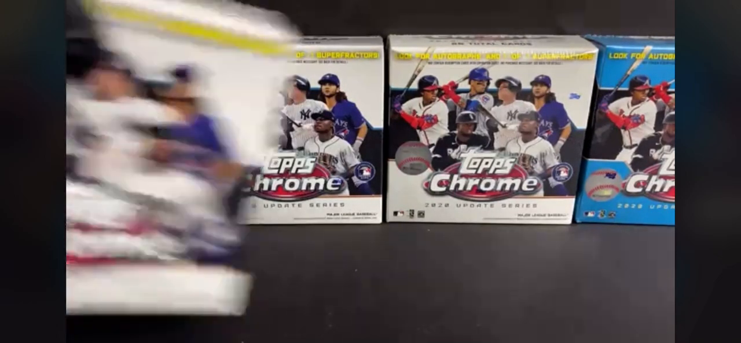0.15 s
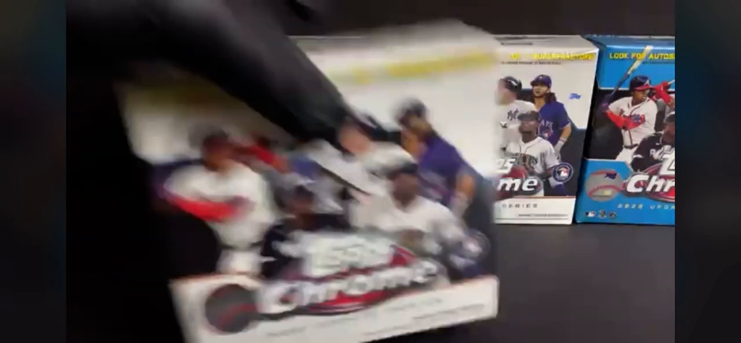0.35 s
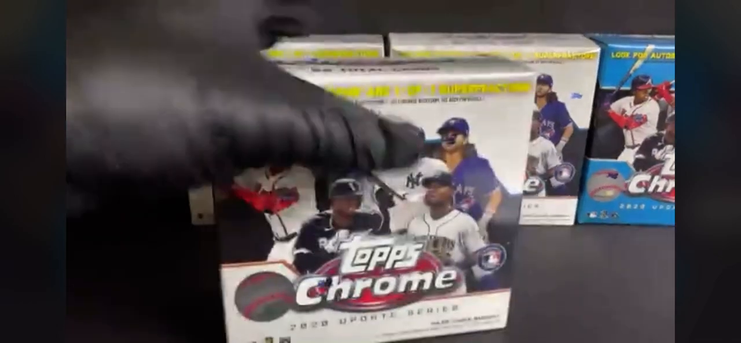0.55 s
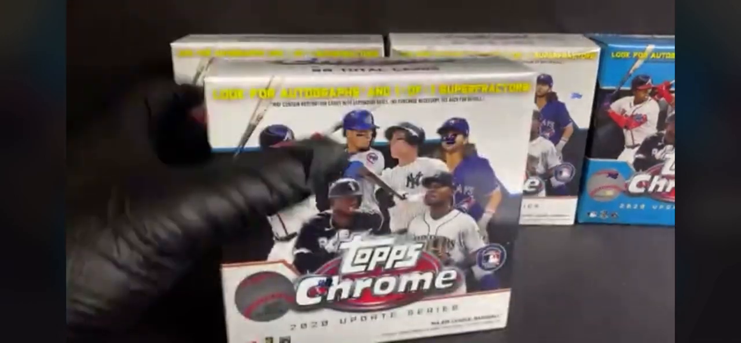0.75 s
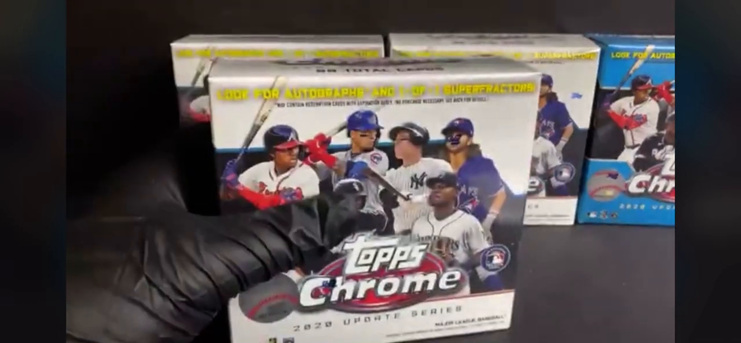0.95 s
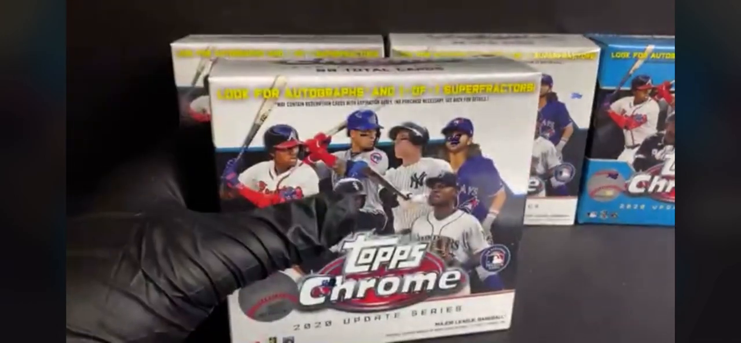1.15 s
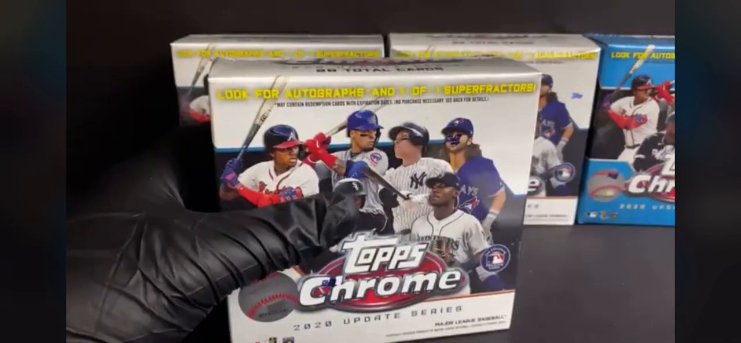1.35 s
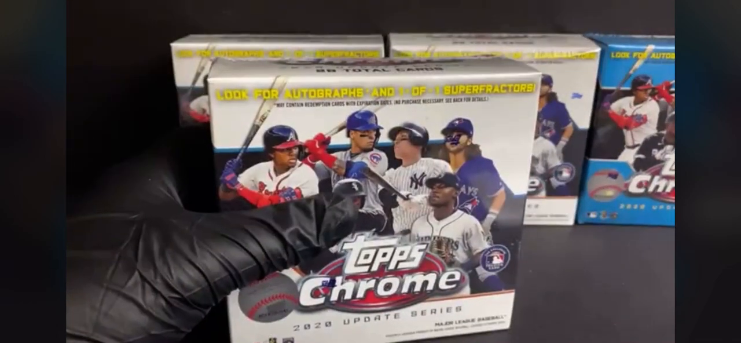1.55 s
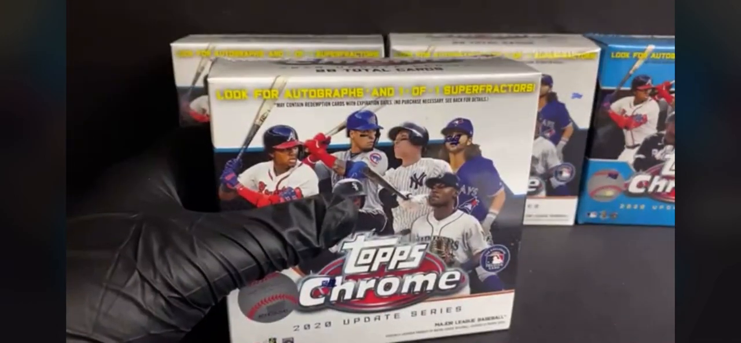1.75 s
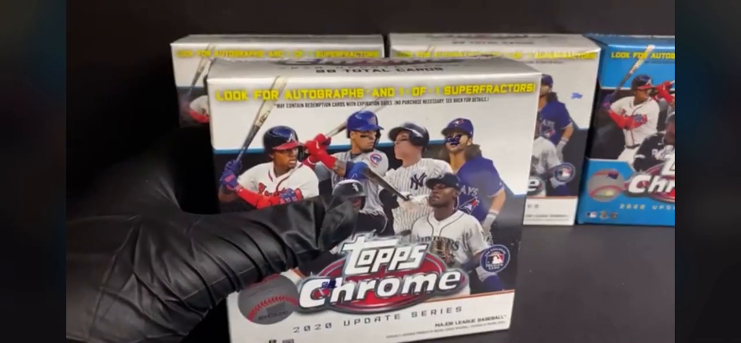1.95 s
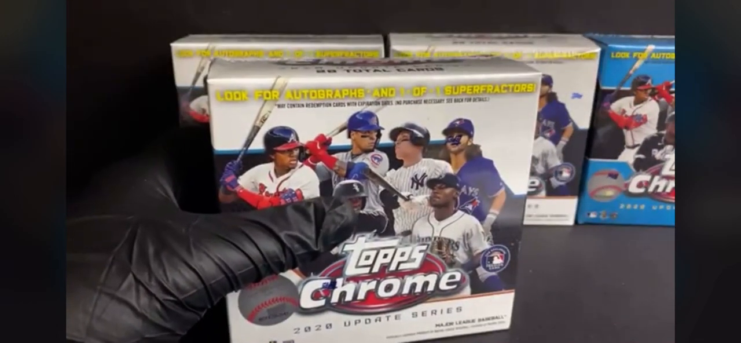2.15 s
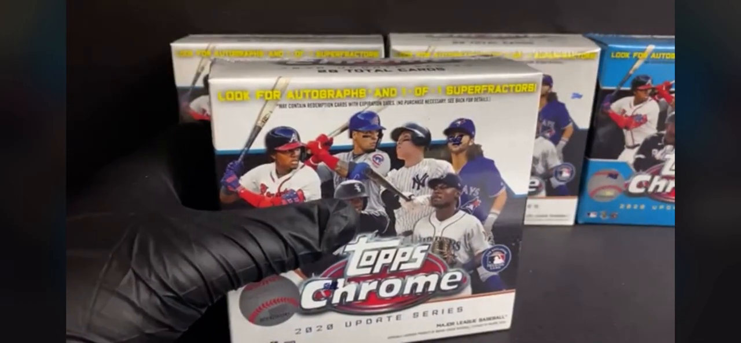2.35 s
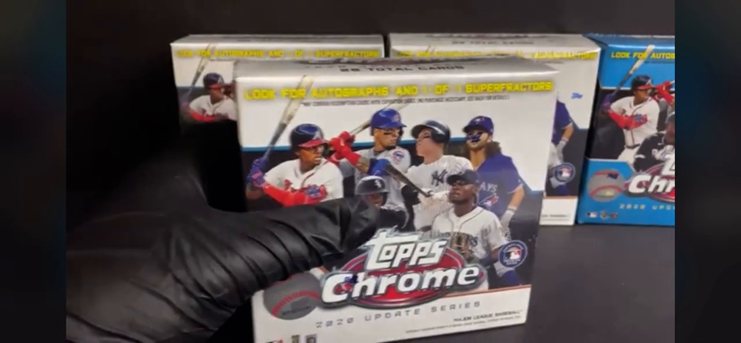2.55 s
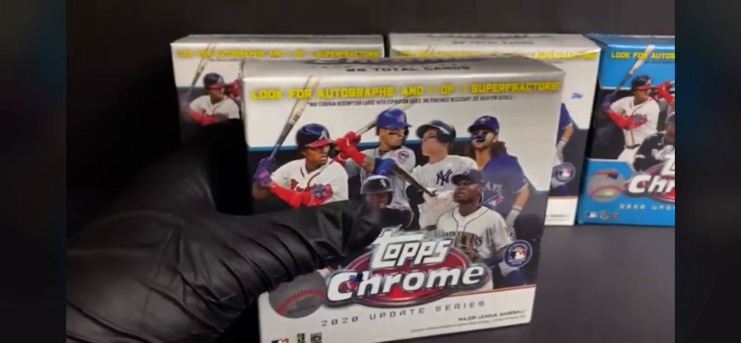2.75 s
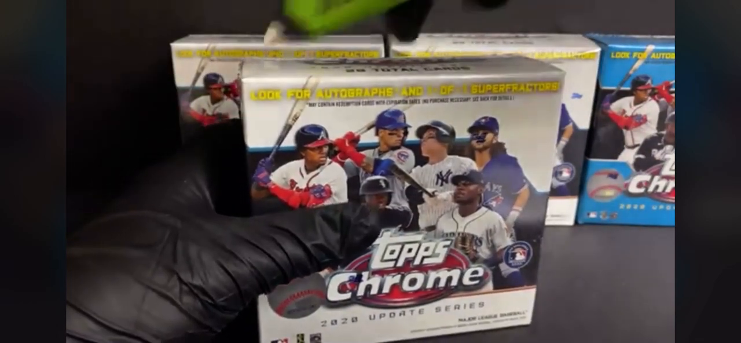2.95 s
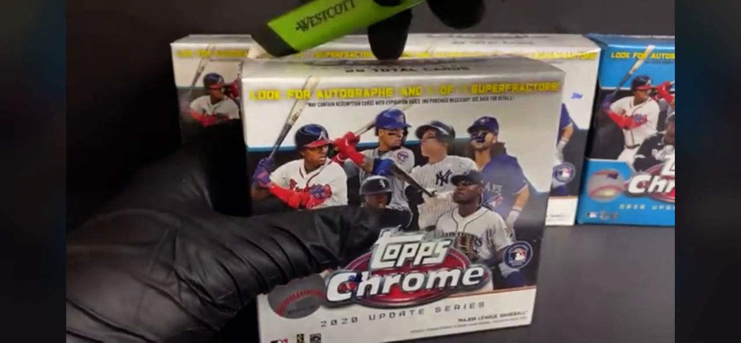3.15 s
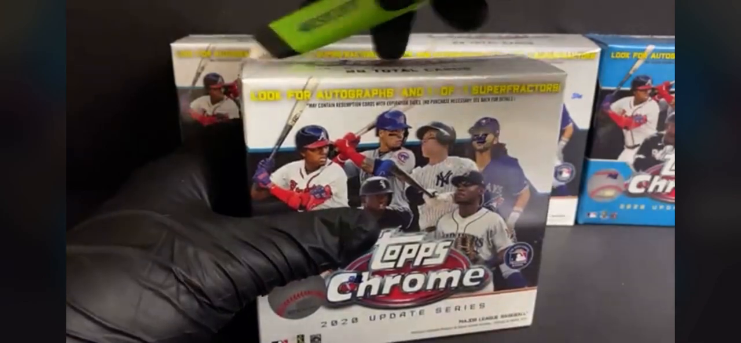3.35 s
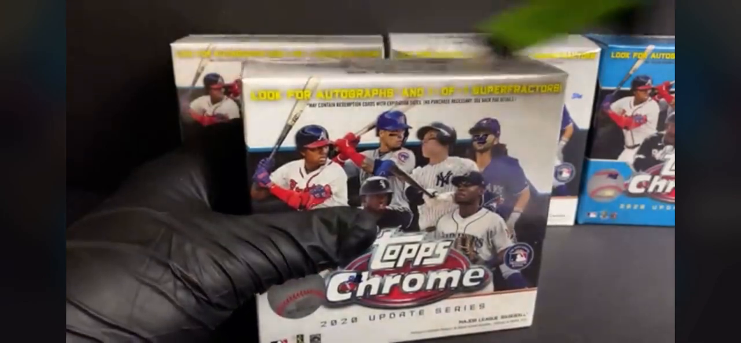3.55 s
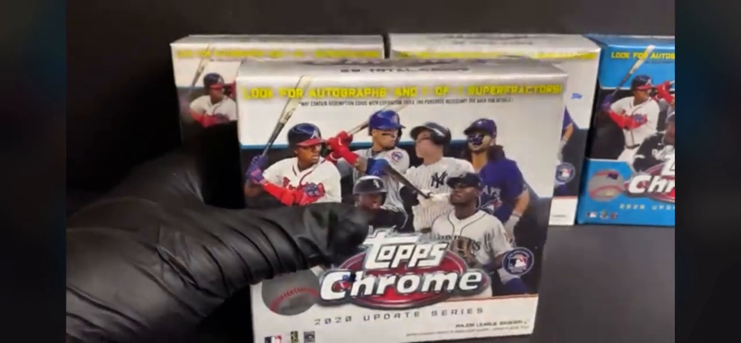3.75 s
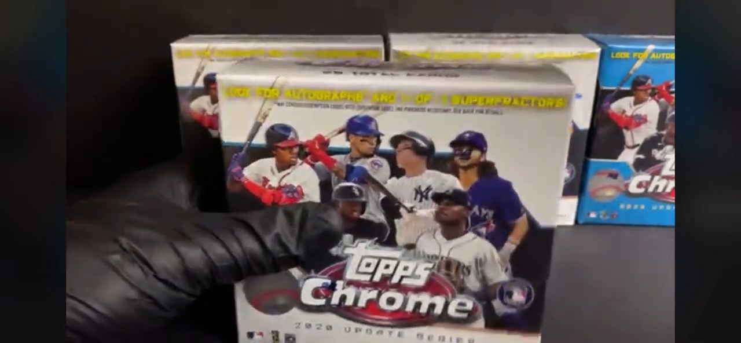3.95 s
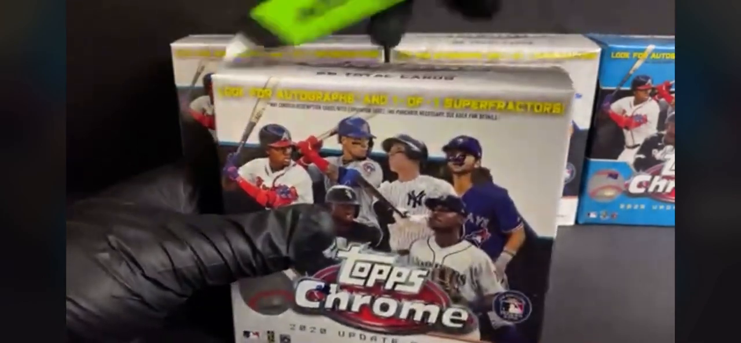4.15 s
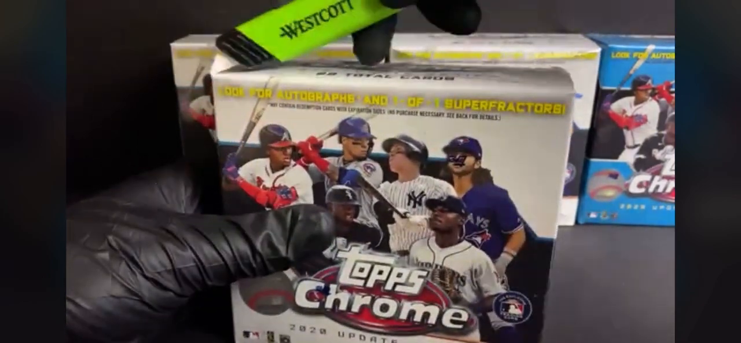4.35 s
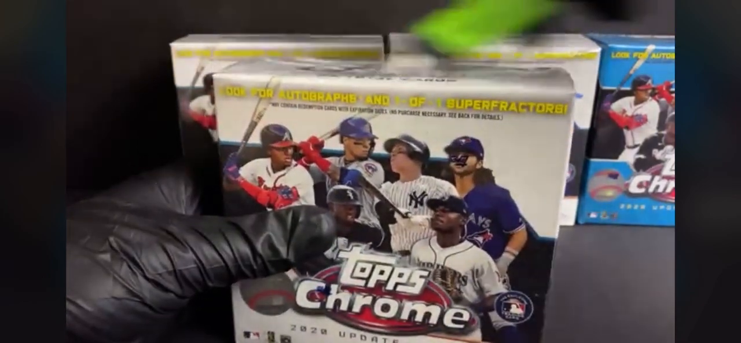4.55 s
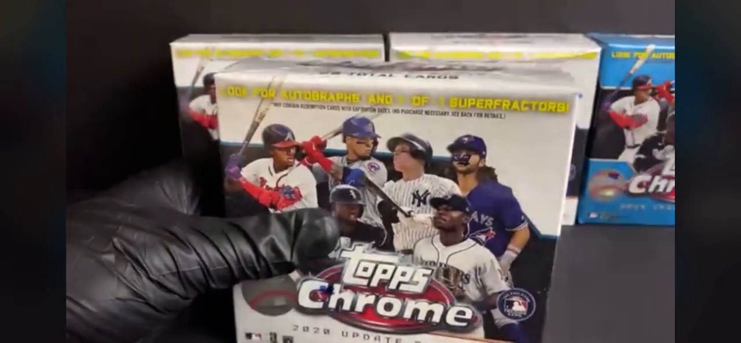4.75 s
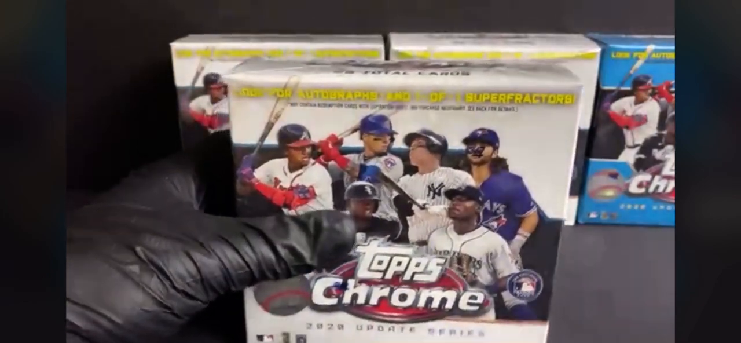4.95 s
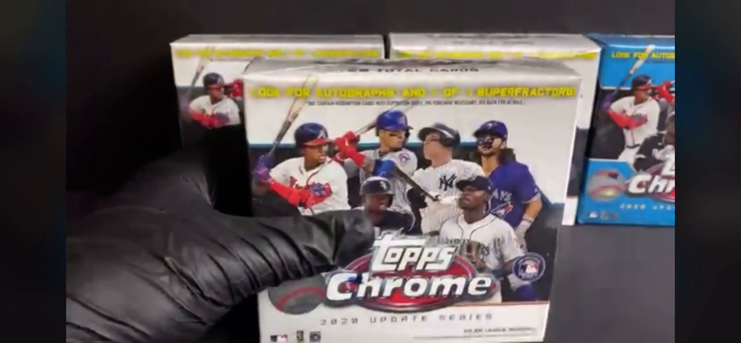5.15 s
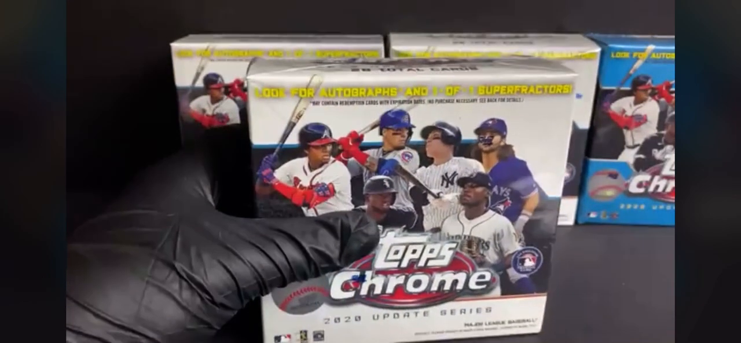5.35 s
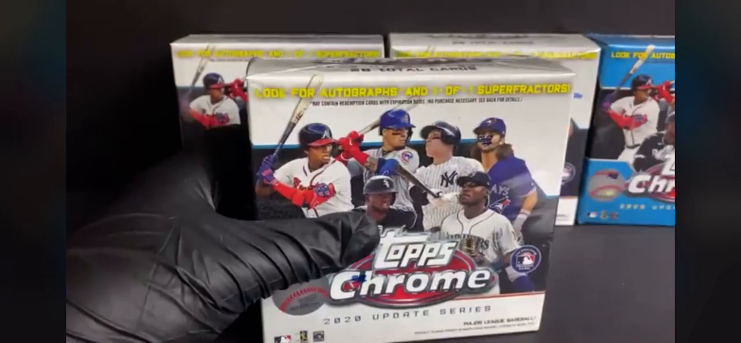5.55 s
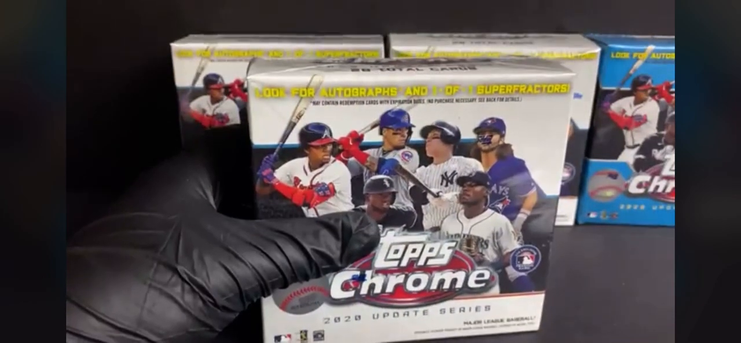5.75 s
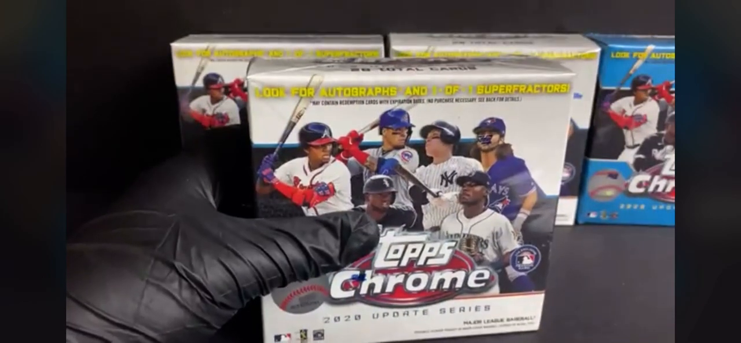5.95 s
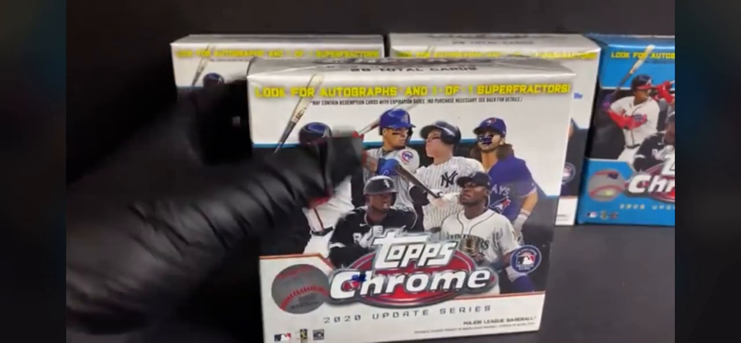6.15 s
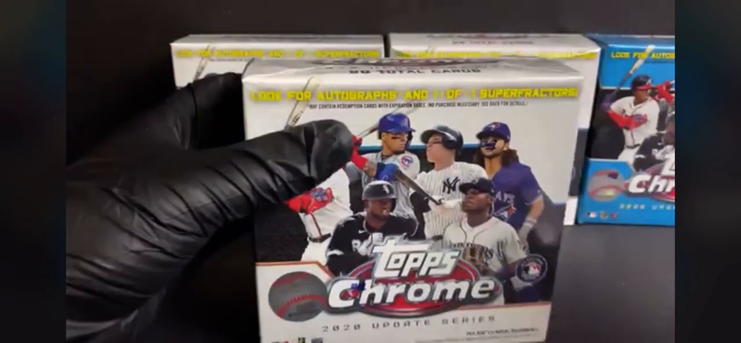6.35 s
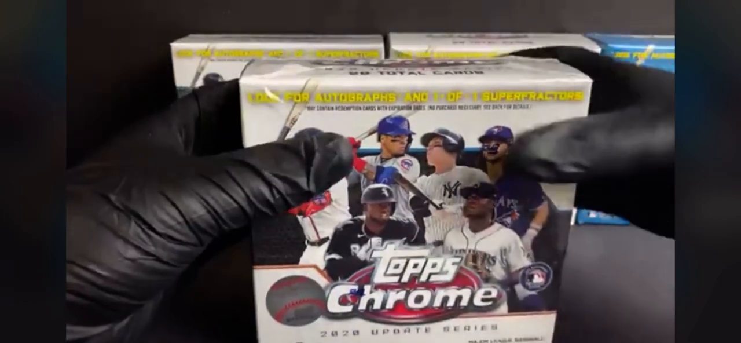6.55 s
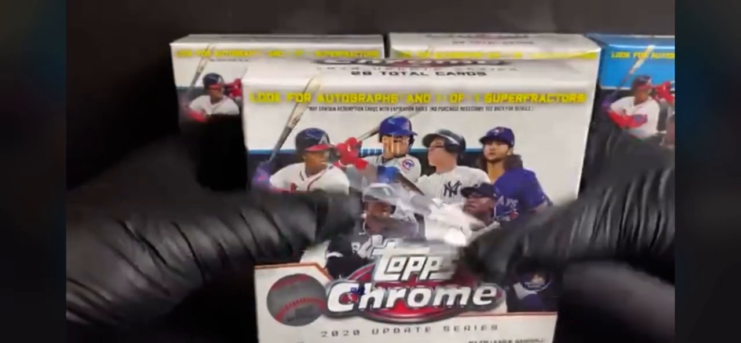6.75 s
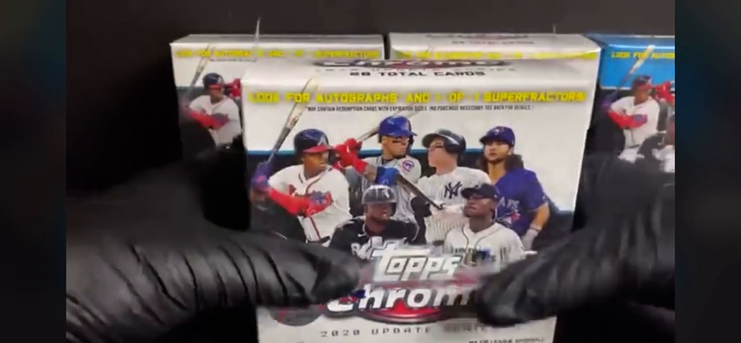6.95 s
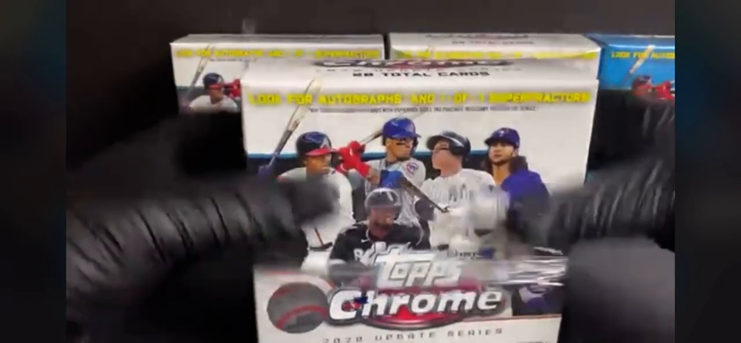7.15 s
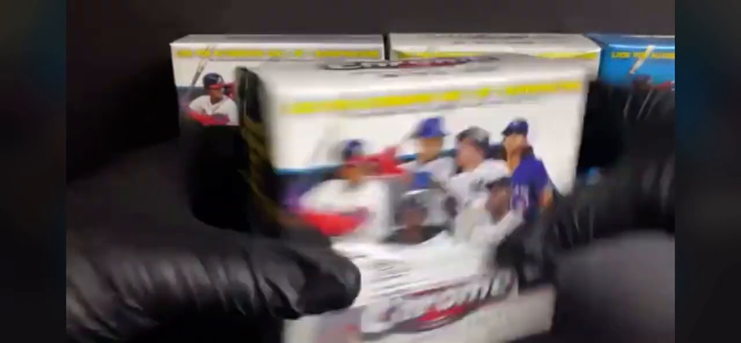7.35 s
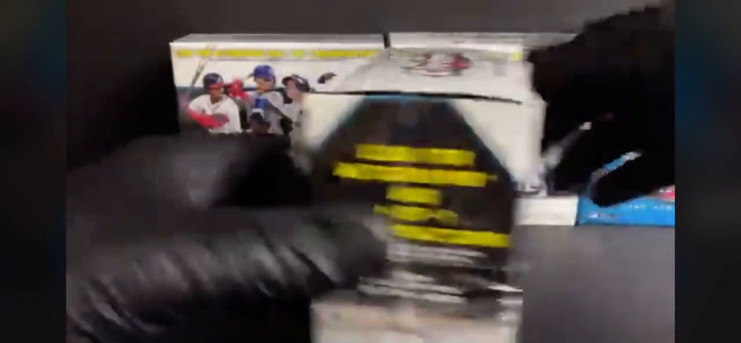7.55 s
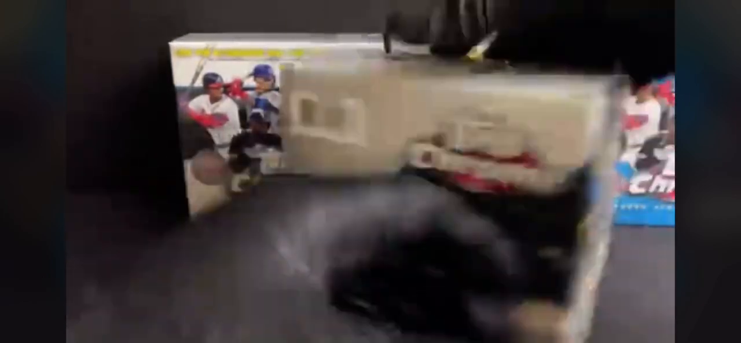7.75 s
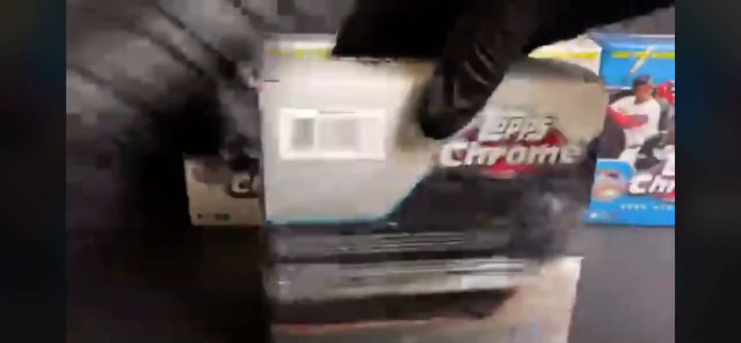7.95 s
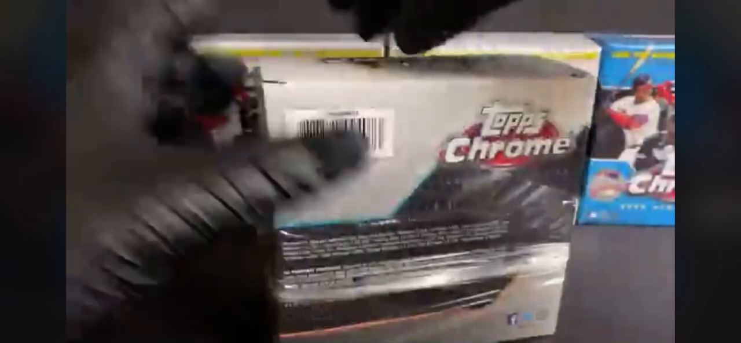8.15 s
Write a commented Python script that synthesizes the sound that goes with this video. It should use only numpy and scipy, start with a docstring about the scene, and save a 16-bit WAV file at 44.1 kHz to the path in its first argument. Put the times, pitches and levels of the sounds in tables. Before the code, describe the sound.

A small microphone near a table catches a box set down, light plastic knocks of a knife being picked up, and a few tiny clicks. After a pause the blade rips twice along the taut film, a second apart, shaking the cardboard. The slider snaps, the knife is dropped sharply, and rubbery gloves slide, crinkle and knock the box over low room rumble.

```python
"""Gloved hands set a film-wrapped cardboard box on a table: taps ring its walls, thud and snap the film.
A plastic box knife rattles on the table as it is picked up, and its slider clicks.
Two cuts follow, each a judder of the box walls with a hiss of film; the slider clicks and the knife is dropped.
Then the hands turn the box, with taps and with gloves sliding on the film as shaped random clicks.
Behind it lie a small room's echo, a low noise rumble and a hum that starts to fade shortly before the first cut."""
import sys
import numpy as np
from scipy import signal
from scipy.fft import rfft, irfft, next_fast_len
from scipy.io import wavfile

SR = 44100
rng = np.random.default_rng(int(sys.argv[2]) if len(sys.argv) > 2 else 0)


def materialize(psi):
    """Save the field psi as 16-bit PCM at rate SR to the path in sys.argv[1].

    A 1-D psi becomes a single channel; in a 2-D psi each row is a channel.
    """
    bounded = np.clip(np.atleast_2d(psi).T, -1, 1)
    quanta = np.round(bounded * 32767).astype(np.int16)
    wavfile.write(sys.argv[1], SR, quanta)


N = 361179   # length in samples

# Knife knocking on the table: start_s, knife_level_db, table_level_db, rattle_s, brightness_db_per_octave
KNIFE_KNOCKS = [(0.7344, -36.5, -41.5, 0.031, 11), (0.7654, -50, -36, 0.005, 0),
                (0.7785, -31.5, -46, 0.023, -10), (0.814, -25, -35, 0.0055, 4),
                (0.8296, -25.5, -37, 0.0067, 16.5), (0.9307, -44.5, -47, 0.012, -4),
                (1.1823, -33.5, -44.5, 0.0067, -6.5), (1.234, -50.5, -50, 0.01, -1),
                (1.313, -36.5, -42.5, 0.0072, -10), (1.3205, -31.5, -66, 0.0062, 0),
                (1.398, -50, -56, 0.0037, -19), (1.4372, -37, -42, 0.011, -8.5),
                (1.4567, -31, -50, 0.008, 0.1), (1.5506, -43.5, -45.5, 0.012, -11),
                (1.6054, -62, -48.5, 0.02, -1.5), (1.6507, -48.5, -50, 0.0083, -6),
                (1.7463, -47.5, -46.5, 0.041, 6), (1.808, -47, -46.5, 0.0063, 1),
                (1.826, -45, -67, 0.0053, 3), (5.6786, -24, -32, 0.015, 18),
                (5.6954, -14, -27.5, 0.0085, -1.5)]
# Clicks of the blade slider, levels before the low cut: start_s, level_db, brightness_db_per_octave
SLIDER_CLICKS = [(1.9616, -56, -7), (2.049, -54.5, -36), (2.315, -55, 12), (2.3342, -53, -22),
                 (2.4354, -44, -7), (2.614, -37.5, -21), (4.8361, -15.5, 8.5), (4.999, -34.5, -8),
                 (5.2993, -60, -24)]
# Fingers and blade jolting the box: start_s, wall_level_db, thud_level_db, snap_level_db
BOX_TAPS = [(0.276, -52.5, -74, -86), (0.352, -52, -58, -43.5), (0.359, -29.5, -32.5, -42),
            (0.4, -32.5, -31, -47), (2.712, -47, -81, -65), (2.977, -39.5, -70, -46.5),
            (3.002, -46.5, -53.5, -68), (3.369, -38.5, -41.5, -54), (3.506, -23, -63, -48),
            (3.539, -24.5, -60, -49), (3.601, -47, -31, -37.5), (4.181, -38, -41, -41),
            (4.518, -18.5, -64, -54), (4.63, -35, -31.5, -43), (6.515, -51.5, -68, -46.5),
            (6.587, -42.5, -45, -57), (6.645, -47, -41.5, -65), (6.665, -35.5, -64, -45),
            (6.683, -35.5, -40.5, -41.5), (6.923, -40, -52.5, -72.5), (7.119, -37, -39.5, -59),
            (7.151, -25.5, -32, -40), (7.349, -42.5, -69, -64), (7.383, -41, -77, -58),
            (7.414, -41, -67, -44), (7.514, -30, -61, -42.5), (7.521, -37, -53, -58),
            (7.568, -43.5, -45, -55), (7.592, -36.5, -45, -45.5), (7.802, -54, -48.5, -55.5),
            (7.844, -32, -73, -45)]
# Blade drawn through the film: peak_s, swell_s, sag_s, wall_level_db, hiss_level_db
CUTS = [(3.53, 0.17, 0.067, -30.5, -41), (4.535, 0.13, 0.092, -29, -42)]
# Gloves sliding and squeezing: peak_s, swell_s, sag_s, wall_level_db, rustle_level_db, fizz_level_db
GLOVE_SLIDES = [(0.375, 0.005, 0.074, -51, -60, -69), (0.53, 0.038, 0.048, -85, -77, -71),
                (1.78, 0.052, 0.073, -72, -53, -73), (1.9, 0.05, 0.14, -78, -64.5, -98),
                (2.09, 0.037, 0.028, -89, -65, -76), (2.59, 0.11, 0.038, -79, -62, -66),
                (3.89, 0.29, 0.072, -67, -72, -70.5), (5.95, 0.05, 0.19, -75, -61, -77),
                (6.15, 0.056, 0.03, -79, -67.5, -70), (6.28, 0.15, 0.22, -71, -79, -75),
                (6.685, 0.018, 0.18, -50, -60, -49.5), (6.94, 0.048, 0.057, -57, -62, -60),
                (6.995, 0.0089, 0.01, -58, -62, -51.5), (7.165, 0.027, 0.082, -53.5, -53.5, -51),
                (7.41, 0.1, 0.051, -55.5, -67, -53.5), (7.5, 0.45, 0.7, -65.5, -66, -78),
                (7.69, 0.19, 0.1, -65, -57, -57), (7.86, 0.03, 0.19, -70, -63, -60)]
# The notes each body rings at when hit: pitch_hz, level_db, t60_s (time to die away by 60 dB)
BOX_WALL_NOTES = [(296, -14.5, 0.094), (425, -2, 0.094), (517, 1.5, 0.044), (620, 6.5, 0.046),
                  (652, 1.5, 0.069), (760, -11.5, 0.067), (933, -7, 0.072), (1264, -13, 0.05),
                  (1486, -14, 0.083)]
BOX_THUD_NOTES = [(71, -13, 0.078), (117.5, -8.5, 0.081), (162.8, 7.5, 0.047), (237, 2.5, 0.031)]
TABLE_NOTES = [(169.3, -10.5, 0.52), (203.7, 1, 0.028), (284.7, -2, 0.12), (338.4, 0, 0.065),
               (410, 0, 0.058), (584, -5.5, 0.16)]
KNIFE_NOTES = [(1034, -15.5, 0.059), (1362, 2, 0.02), (1777, 6.5, 0.0079), (2280, 8, 0.0046),
               (2760, 11.5, 0.0067), (3400, 1, 0.017), (4150, -5, 0.0078), (5440, -22, 0.015),
               (5800, -15.5, 0.0071), (7870, -56, 0.0015)]
SLIDER_NOTES = [(2670, 7.5, 0.0033), (3460, 7, 0.003), (4350, 10.5, 0.0029), (5420, -11, 0.003),
                (6000, -16.5, 0.0031), (7200, -4.5, 0.0056), (7500, -26, 0.0096)]
# Tone shaping of film being cut, film being rubbed, and the quiet room: pitch_hz, gain_db
FILM_CUT_COLOUR = [(710, -17), (1200, -9), (1520, -17.5), (3020, -4), (3350, -3.5), (7530, -3.5),
                   (9800, -10.5), (12700, -66), (21600, -120)]
FILM_RUB_COLOUR = [(590, -38), (1000, -7), (1880, -4), (2090, -8.5), (3560, -2.5), (3990, -3.5),
                   (9800, -3.5), (12700, -98), (21600, -120)]
ROOM_COLOUR = [(24, -39.5), (40, -7.5), (69, 6.5), (98, 3), (210, -4.5), (492, -7.5), (1870, -21),
               (7790, -23), (9800, -31), (12700, -67), (21600, -120)]

HIT_SPREAD_DB = 2.4   # how much the notes of a body vary from hit to hit
CLICK_S, TAP_S = 0.0012, 0.0058   # time scales of the force in a click and in a tap
SNAP_DB_PER_OCTAVE = -4
# How fast each movement sets in before its start and dies after its end
CUT_TOUCH_DB_PER_S, CUT_LIFT_DB_PER_S = 697, 800
SLIDE_TOUCH_DB_PER_S, SLIDE_LIFT_DB_PER_S = 501, 403
# Levels at the start and at the end of a movement, compared with its peak
CUT_WALL_EDGES_DB, CUT_HISS_EDGES_DB = (-22, -9), (-16.5, -0.5)
SLIDE_EDGES_DB = (-8, -11)
HISS_LAG_S = 0.023   # the hiss of a cut peaks at most this much later than the walls
TEAR_SPREAD_DB = 2.6
FIZZ_HZ = 3040   # the rustle of the film lies below, its fizz above
ROOM_TONE_DB = -67.5
HUM_HZ, HUM_DB, HUM_FADE_DB_PER_S, HUM_FADES_AT_S = 98, -72, 16, 2.9
ROOM_T60_S, TREBLE_T60_S, ROOM_SPLIT_HZ = 0.34, 0.52, 420
ROOM_DB, TREBLE_DB = -17.5, -11.5
MIC_LOW_HZ, MIC_TOP_HZ = 46, 10900


def from_db(db):
    """Turn a level in dB into a plain multiplier."""
    return 10 ** (np.asarray(db) / 20)


def rms_one(x):
    """Scale a signal to an average strength (rms) of 1."""
    return x / np.sqrt(np.mean(x ** 2) + 1e-20)


def drift(rate_hz):
    """Slow random wandering with rms 1: noise smoothed twice, made at every 40th sample."""
    keep = np.exp(-80 * np.pi * rate_hz / SR)
    noise = rng.standard_normal(N // 40 + 2002)
    slow = signal.lfilter([1], [1, -2 * keep, keep * keep], noise)[2000:]   # skip the settling
    return np.interp(np.arange(N) / 40, np.arange(len(slow)), rms_one(slow))


def ring(force, hz, t60_s):
    """One note of a body: a unit click rings it at a height near 1; it passes nothing far below or above."""
    r = from_db(-60 / (t60_s * SR))
    angle = 2 * np.pi * hz / SR
    return signal.lfilter([.5, 0, -.5], [1, -2 * r * np.cos(angle), r * r], force + 1e-18)


def grains(per_s, spread_db):
    """Clicks at random moments, with random signs and sizes, scaled to rms 1."""
    sizes = from_db(spread_db * np.minimum(rng.exponential(1, N), 5))
    signed = sizes * rng.choice([-1, 1], N)
    return rms_one(signed * (rng.random(N) < per_s / SR))


def coloured(source, colour):
    """Shape the tone of a source with a gain at each pitch, then scale it to rms 1."""
    hz_points, db_points = np.transpose(colour)
    size = next_fast_len(N)
    hz = np.arange(1, size // 2 + 2) * SR / size
    gain = from_db(np.interp(np.log(hz), np.log(hz_points), db_points))
    return rms_one(irfft(rfft(source, size) * gain, size)[:N])


def struck(notes, times, levels_db, lengths, rise, hard_hz, shake, fall=0.82, tilts=None):
    """Each contact is a short burst of noisy force that rings every note of a body; loose parts shake on."""
    out, t = np.zeros(N + SR), np.arange(SR // 2) / SR
    soften = signal.butter(2, min(hard_hz, .45 * SR), fs=SR, output="sos")
    tilts = np.zeros(len(times)) if tilts is None else tilts
    for start, level_db, length, tilt in zip(times, levels_db, lengths, tilts):
        length = max(length, .0005)
        onset = 1 - np.exp(-t / (rise * length))   # rise is a share of the length
        decay = np.exp(-(t / length) ** fall) + shake * np.exp(-t / 0.041)
        force = rng.standard_normal(len(t)) * onset * decay
        force = signal.sosfilt(soften, force + 1e-18)

        hz, note_db, t60_s = np.transpose(notes)
        note_db = note_db + rng.normal(0, HIT_SPREAD_DB, len(notes)) + tilt * np.log2(hz / 3000)
        # the grip detunes the notes that die quickly
        hz = hz * (1 + 0.02 * rng.standard_normal(len(notes)) * (t60_s < .1))
        sound = sum(from_db(own) * ring(force, f, die_s) for f, own, die_s in zip(hz, note_db, t60_s))
        at = round(start * SR)
        out[at:at + len(t)] += from_db(level_db) * sound / np.abs(sound).max()
    return out[:N]


def strokes(rows, column, edges_db, touch_db_per_s, lift_db_per_s, lag_s=0):
    """Gain over time: each movement swells to its peak, sags, then dies fast; overlaps add in power."""
    t, power = np.arange(0, N + 40, 40) / SR, 0
    for row in rows:
        peak, swell, sag = row[:3]
        start, end = peak - swell, peak + sag
        late_peak = peak + min(lag_s, sag / 2)
        db = np.interp(t, [start - 1, start, late_peak, end, end + 1],
                       [edges_db[0] - touch_db_per_s, edges_db[0], 0, edges_db[1], edges_db[1] - lift_db_per_s])
        power = power + from_db(row[column] + db) ** 2
    return np.interp(np.arange(N) / SR, t, np.sqrt(power))


def rubbed_box(force):
    """A running force rings the walls of the box, each note wavering and dying sooner than when tapped."""
    return rms_one(sum(from_db(db + 2.0 * drift(23)) * ring(force, hz, 0.72 * t60_s)
                       for hz, db, t60_s in BOX_WALL_NOTES))


def film(force, patchy_db, cycles):
    """Taut film: many brief resonances that come and go as the tension shifts."""
    return sum((-1) ** k * from_db(patchy_db * drift(8.9)) * np.sqrt(hz) * ring(force, hz, cycles / hz)
               for k, hz in enumerate(np.geomspace(900, 10500, 24)))


def knife():
    """Rattling knocks ring the plastic handle and, a moment later, the table top; the slider snaps."""
    start, knife_db, table_db, length, tilt = np.transpose(KNIFE_KNOCKS)
    handle = struck(KNIFE_NOTES, start, knife_db, length, rise=0.062, hard_hz=11100, shake=0.075, tilts=tilt)
    table = struck(TABLE_NOTES, start + 0.00521, table_db, length, rise=0.3, hard_hz=785, shake=0.52)

    start, click_db, tilt = np.transpose(SLIDER_CLICKS)
    length = np.full(len(start), CLICK_S)
    clicks = struck(SLIDER_NOTES, start, click_db, length, rise=0.39, hard_hz=13200, shake=0.039,
                    fall=0.63, tilts=tilt)
    low_cut = signal.butter(2, 1700, "high", fs=SR, output="sos")   # so small a part radiates no lows
    return handle + table + signal.sosfilt(low_cut, clicks)


def cuts():
    """The blade judders along the seam: dense uneven slips shake the walls while the film parts with a hiss."""
    wall_gain = strokes(CUTS, 3, CUT_WALL_EDGES_DB, CUT_TOUCH_DB_PER_S, CUT_LIFT_DB_PER_S)
    hiss_gain = strokes(CUTS, 4, CUT_HISS_EDGES_DB, CUT_TOUCH_DB_PER_S, CUT_LIFT_DB_PER_S, HISS_LAG_S)
    slips = from_db(1.2 * drift(60)) * grains(2500, spread_db=2.5)
    walls = rubbed_box(slips)
    tears = grains(5000, spread_db=TEAR_SPREAD_DB) * from_db(0.69 * drift(60))
    hiss = coloured(film(tears, patchy_db=4.0, cycles=29), FILM_CUT_COLOUR)
    return wall_gain * walls + hiss_gain * hiss


def taps():
    """A tap rings the walls, thuds through the whole box a moment later and snaps the film."""
    start, wall_db, thud_db, snap_db = np.transpose(BOX_TAPS)
    length = np.full(len(start), TAP_S)
    film_notes = [(hz, SNAP_DB_PER_OCTAVE * np.log2(hz), 1.7 / hz) for hz in np.geomspace(1500, 9500, 10)]
    walls = struck(BOX_WALL_NOTES, start, wall_db, length, rise=0.66, hard_hz=1170, shake=0.027, fall=1.32)
    thuds = struck(BOX_THUD_NOTES, start + 0.00334, thud_db, length, rise=0.66, hard_hz=282, shake=0.036)
    snaps = struck(film_notes, start, snap_db, length, rise=0.21, hard_hz=8260, shake=0.051)
    return walls + thuds + snaps


def slides():
    """Rubber on film: a fine rustle in clumps with lone ticks, over a dull rub of the walls."""
    wall_gain, rustle_gain, fizz_gain = (
        strokes(GLOVE_SLIDES, column, SLIDE_EDGES_DB, SLIDE_TOUCH_DB_PER_S, SLIDE_LIFT_DB_PER_S)
        for column in (3, 4, 5))
    clumps = from_db(0.78 * drift(5.7))
    grip = grains(2500, spread_db=2.0)
    dull_rub = rms_one(ring(grains(350, spread_db=-1.0), 193, 0.01))
    rub = rubbed_box(grip * clumps) + 0.96 * dull_rub

    fine = grains(6000, spread_db=1.5)
    ticks = grains(120, spread_db=2.5)
    sheet = clumps * coloured(film(fine + 0.24 * ticks, patchy_db=1.2, cycles=8), FILM_RUB_COLOUR)
    rustle = signal.sosfiltfilt(signal.butter(2, FIZZ_HZ, fs=SR, output="sos"), sheet)
    fizz = sheet - rustle
    return wall_gain * rub + rustle_gain * rustle + fizz_gain * fizz


def room(x):
    """Dense echoes as dying noise; the treble starts weaker but dies more slowly."""
    t = np.arange(SR) / SR
    low, high = (signal.sosfilt(signal.butter(2, ROOM_SPLIT_HZ, kind, fs=SR, output="sos"),
                                rng.standard_normal(SR)) for kind in ("low", "high"))
    echoes = low * from_db(-60 * t / ROOM_T60_S) + high * from_db(TREBLE_DB - 60 * t / TREBLE_T60_S)
    echoes = echoes * np.clip(t / 0.0016, 0, 1)   # the echoes build up over 1.6 ms
    return signal.fftconvolve(x, echoes / np.sqrt(np.sum(echoes ** 2)))[:N]


def background():
    """Room tone is shaped noise that swells a little; noise through one narrow ring gives a wavering, fading hum."""
    fade_db = HUM_FADE_DB_PER_S * np.maximum(np.arange(N) / SR - HUM_FADES_AT_S, 0)
    hum = from_db(HUM_DB - fade_db) * rms_one(ring(rng.standard_normal(N), HUM_HZ, 1.0))
    tone = coloured(rng.standard_normal(N), ROOM_COLOUR)
    return from_db(ROOM_TONE_DB + 0.36 * drift(0.17)) * tone + hum


def scene():
    """Everything on the table, its echo and the background."""
    near = knife() + cuts() + taps() + slides()
    return (near + from_db(ROOM_DB) * room(near) + background())[None]


def record(dry):
    """A small microphone with no deep bass; the top is cut steeply."""
    thin = signal.sosfilt(signal.butter(4, MIC_LOW_HZ, "high", fs=SR, output="sos"), dry)
    return signal.sosfilt(signal.cheby2(16, 60, MIC_TOP_HZ, fs=SR, output="sos"), thin)


dry = scene()
out = record(dry)
materialize(out)
```